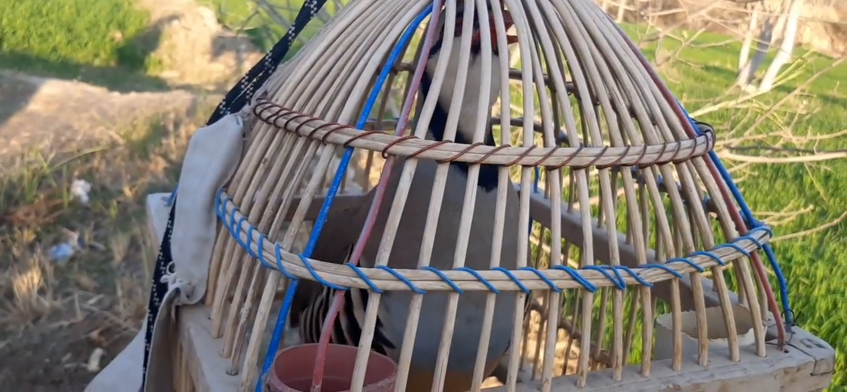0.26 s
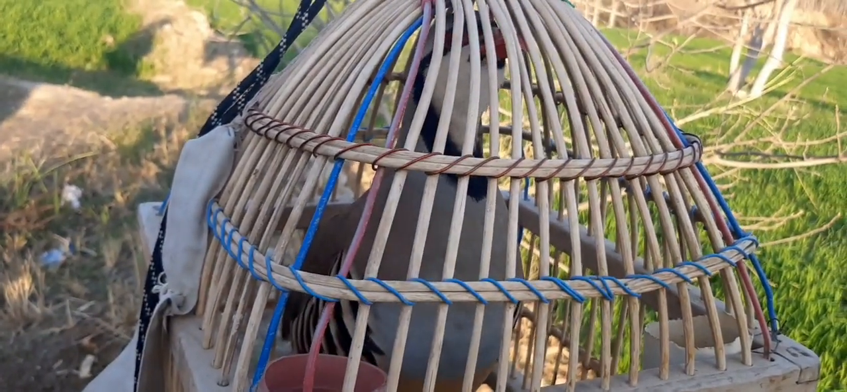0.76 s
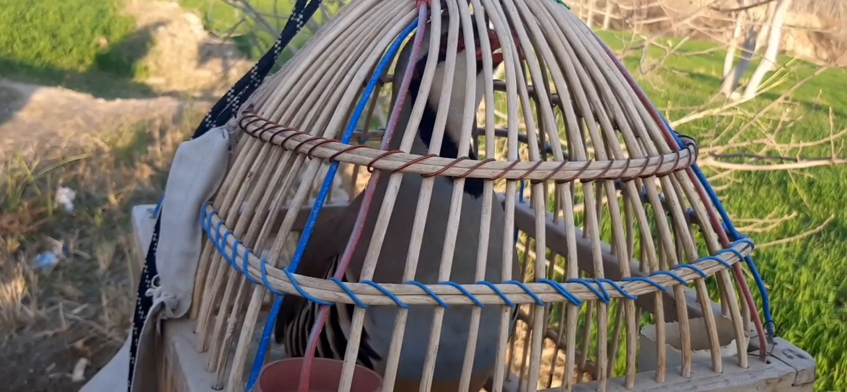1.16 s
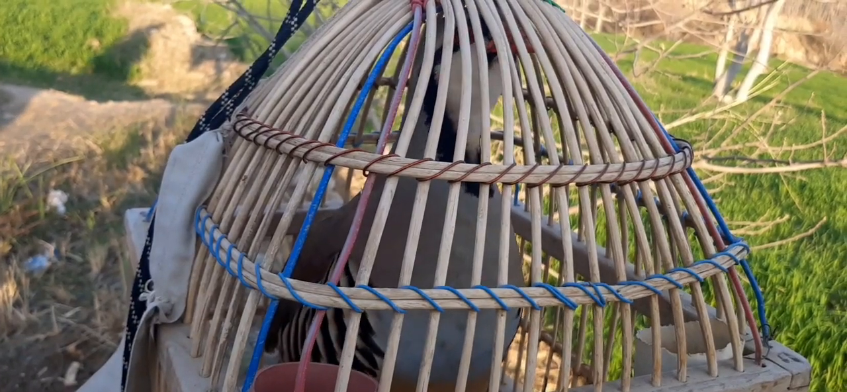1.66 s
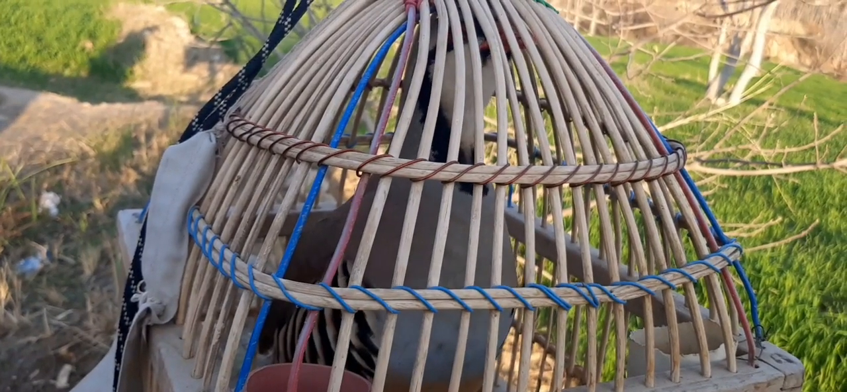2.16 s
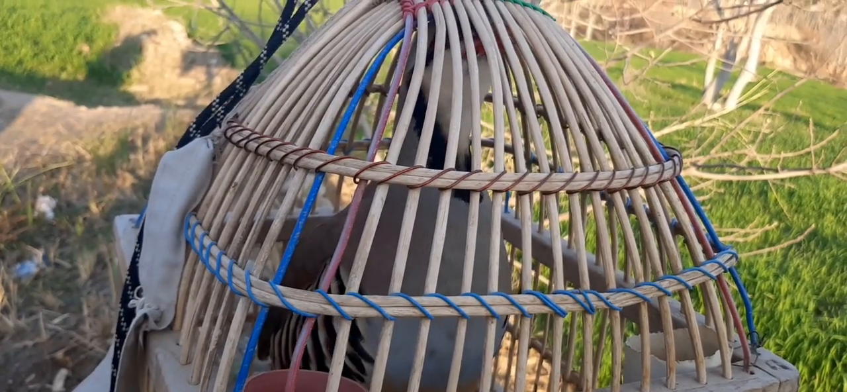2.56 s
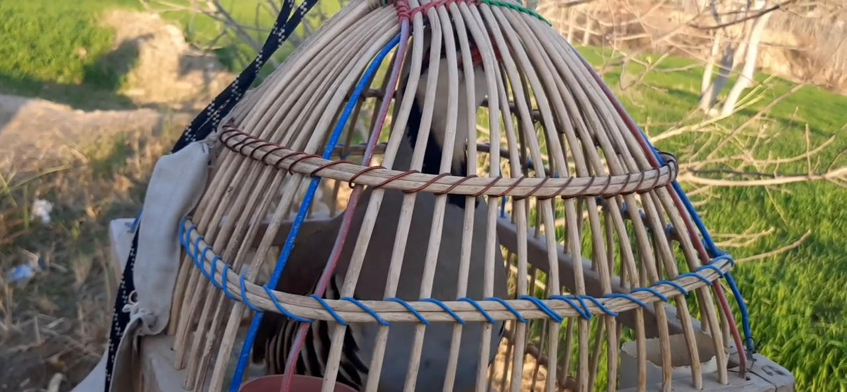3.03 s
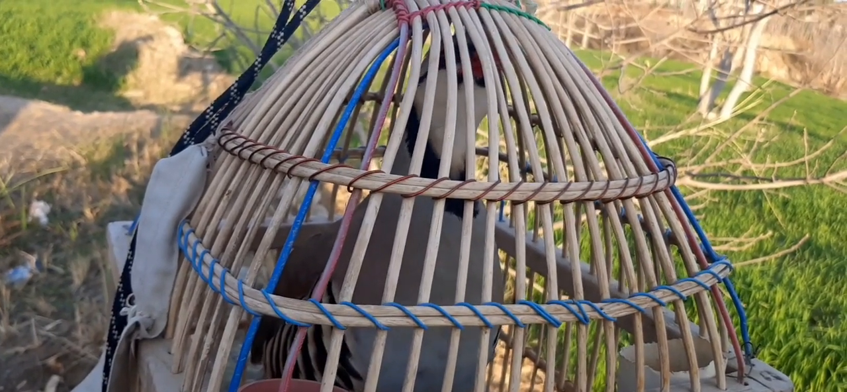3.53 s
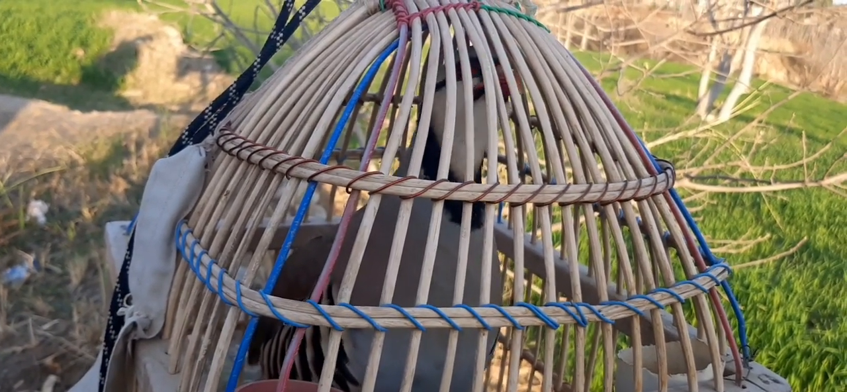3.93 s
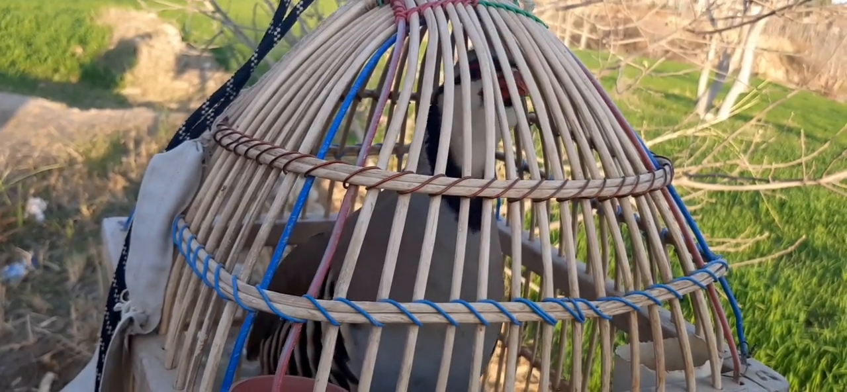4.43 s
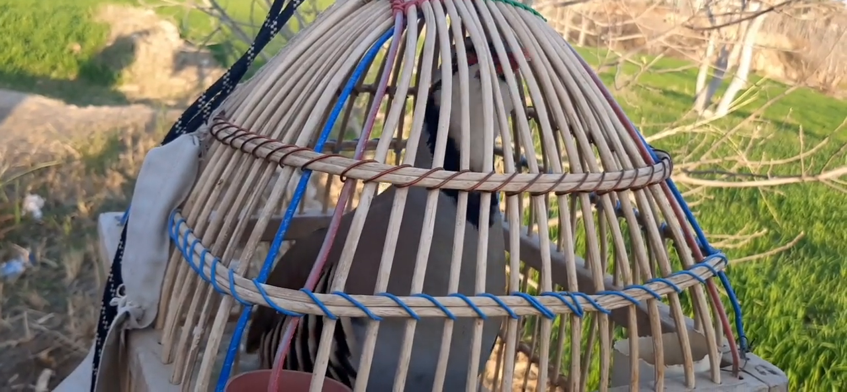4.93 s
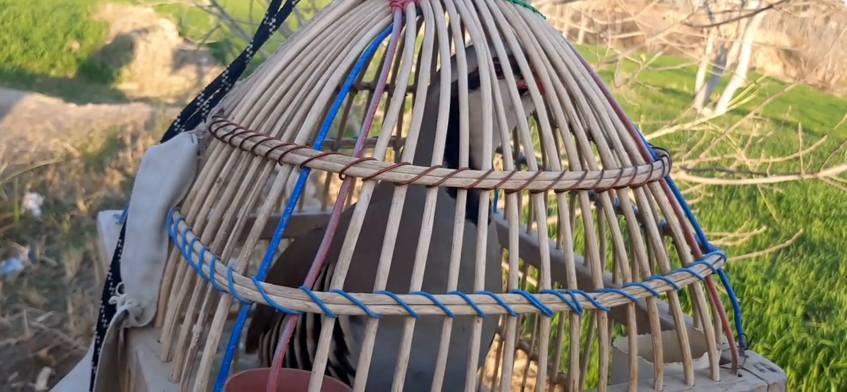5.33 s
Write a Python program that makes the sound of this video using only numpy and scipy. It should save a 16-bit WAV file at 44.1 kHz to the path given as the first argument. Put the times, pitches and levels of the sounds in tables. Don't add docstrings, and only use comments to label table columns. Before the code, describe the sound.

Close, dry stereo phone pickup of a partridge's steady cackle: a sharp chuck, a weak little ka, then a rough buzzing kar, over and over. Early on another partridge overlaps distantly; around one and a half to two seconds two longer slurred notes replace the usual pair. Tiny songbird whistles cluster near the end, with a few cane ticks, a faint rustle and very low distant hum.

```python
import sys
import numpy as np
from scipy import signal
from scipy.fft import rfft, irfft
from scipy.io import wavfile
from scipy.ndimage import uniform_filter1d, minimum_filter1d

SR = 44100
rng = np.random.default_rng(int(sys.argv[2]) if len(sys.argv) > 2 else 0)


def amplitude_ratio(level_db):
    exponent = np.asarray(level_db, float) / 20
    return 10 ** exponent


def digitize_waveform(pressure):
    field = np.atleast_2d(pressure).T
    bounded = np.clip(field, -1, 1)
    quanta = np.round(bounded * 32767).astype(np.int16)
    wavfile.write(sys.argv[1], SR, quanta)


N = 246519
TIME = np.arange(N) / SR
HZ = np.fft.rfftfreq(N, 1 / SR)


def phrase():
    # start [t/s], length [t/s], peak [level/dB], high voice [f/Hz], place of peak [0-1]
    chuck = [(.073, 0.036, -14, 781, 0.1), (.205, .055, -14, 800.8, .2), (.489, .039, -12, 894, 0),
             (.947, 0.054, -14, 871.3, .5), (1.419, 0.048, -13, 784.6, .4),
             (1.831, 0.048, -10.5, 755.8, 0.39), (2.253, 0.052, -14, 810.4, 0),
             (2.702, 0.045, -13.5, 750.4, .3), (3.155, 0.045, -14, 777.4, 0),
             (3.606, .045, -15.5, 744.6, .5), (4.061, 0.041, -15.5, 715.8, 0.35),
             (4.527, 0.043, -14, 801, 0.21), (4.987, 0.044, -15, 715.1, 0.91),
             (5.454, 0.041, -14.5, 732.7, 0.21)]
    ka = [(.628, 0.036, -21.5, 859, 0.2), (1.121, .041, -21.5, 904, 0.41), (2.399, 0.049, -24.5, 887, 0.23),
          (2.84, 0.053, -23, 907.6, .55), (3.299, 0.038, -21.5, 892, 0.28), (3.745, .035, -23.5, 910, 0.25),
          (4.209, 0.033, -23.5, 920, .5), (4.675, 0.038, -21, 890, 0.47), (5.137, 0.038, -21.5, 853.6, .3)]
    kar = [(.272, 0.081, -15, 759, 0.46), (.706, 0.08, -11.5, 818.2, 0.49), (1.2, 0.074, -8.5, 818.5, 0.4),
           (2.482, .081, -12, 837, 0.36), (2.93, .082, -12.5, 824.4, 0.43),
           (3.393, .079, -14.5, 835.1, 0.62), (3.835, .075, -17, 861.1, 0.72),
           (4.297, 0.08, -16, 892, 0.65), (4.762, 0.068, -14.5, 882.3, 0.43),
           (5.227, 0.067, -14, 844, 0.41)]
    slur = [(1.563, .131, -12.5, 844.3, 0.71), (1.977, .14, -14.5, 884, .8)]
    attack_s = (0.0076, 0.0074, 0.0067, 0.0089)
    release_s = (0.0087, 0.007, 0.016, .016)
    edge_db = (-27.5, -18.5, -25, -31.5)
    open_db = (-6.5, -1.5, -10, -1.5)
    close_db = (-12.5, -4.5, -6, -3)
    # at opening, peak, close [level/dB]
    overtone_shape_db = ((-21, -22.5, -12.5), (-4, -3, 0), (-1, -22.5, -13), (-13, -19, -17.5))
    notes = sorted((row, kind) for kind, rows in enumerate((chuck, ka, kar, slur)) for row in rows)
    shapes = []
    for (start_s, length_s, db, _, place), k in notes:
        opening, peak, close = overtone_shape_db[k]
        end_s = start_s + length_s
        peak_s = np.clip(place * length_s, attack_s[k] + .001, length_s - release_s[k] - .001)
        shapes.append([(start_s, db + edge_db[k], opening),
                       (start_s + attack_s[k], db + open_db[k], opening),
                       (start_s + peak_s, db, peak),
                       (end_s - release_s[k], db + close_db[k], close),
                       (end_s, db + edge_db[k], close)])
    return np.array([k for _, k in notes]), np.array([row for row, _ in notes]), shapes


def partridge():
    sag = (.86, 1, .93, .92)
    scoop = (.02, .03, .14, .03)
    low_early_db = (-33.5, -32.5, -32, -27.5)
    low_last_db = (-13.5, -13, -12.5, -21.5)
    low_swell_s = (0.018, .015, 0.022, .02)
    low_end_hz = (267.2, 440.1, 287.3, 247.2)
    hoarse = (.3, .34, .22, .25)
    clear_s = (.706, 1.2, 1.563, 4.675, 4.762)
    pure_s = (2.399,)
    shut_s = (0.021, 0.022, 0.014, .012)
    beak_kind_db = (-19, -8, -15.5, -14)
    # [t/s], [level/dB]
    gape = [(0, 2), (.6, 1), (1.15, 2.5), (1.8, 2), (2.4, 3.5), (2.9, 6.5), (3.5, 2), (4.2, 3.5), (4.8, -1),
            (5.5, 3.5)]
    low_hold_hz, low_sag_hz_s = 500, 6621
    clear_rough, clear_low_db, break_s = .11, -14, 0.031
    pure_rough, pure_sag, pure_low_db = .03, .78, -38
    waver, waver_hz, scoop_s = .02, 14, 0.0053

    kinds, rows, shapes = phrase()
    call_db, overtone_db = played(shapes, fade_s=.0045)
    start, end = rows[:, 0], rows[:, 0] + rows[:, 1]
    note = np.searchsorted((start[1:] + end[:-1]) / 2, TIME)
    by_kind = lambda values: np.array(values)[kinds][note]
    among = lambda times_s: (np.abs(start[:, None] - times_s).min(axis=1) < .02)[note]
    pure, clear = among(pure_s), among(clear_s)
    left_s, length_s = (end[note] - TIME).clip(0), (end - start)[note]

    swell = np.exp(-left_s / by_kind(low_swell_s))
    low_db = by_kind(low_early_db) + (by_kind(low_last_db) - by_kind(low_early_db)) * swell
    resting = clear * ((left_s - break_s) / .008).clip(0, 1)
    rough = by_kind(hoarse) + resting * (clear_rough - by_kind(hoarse))
    rough = np.where(pure, pure_rough, rough)
    low_db = np.where(pure, pure_low_db, low_db + resting * clear_low_db + 3 * wobble(32))

    high_from = rows[note, 3]
    high_to = high_from * np.where(pure, pure_sag, by_kind(sag))
    held = (left_s / length_s).clip(0, 1) ** (length_s / .085) ** 1.3
    high_hz = high_to + (high_from - high_to) * held
    slide = by_kind(scoop) * np.exp(-(TIME - start[note]).clip(0) / scoop_s)
    high_hz *= 1 + waver * ~pure * wobble(waver_hz) - slide
    low_hz = np.minimum(by_kind(low_end_hz) + low_sag_hz_s * left_s,
                        low_hold_hz * (1 + 0.068 * wobble(12)))

    high, high_phase = membrane(high_hz, rough, jitter=.08, scatter_db=6)
    low, low_phase = membrane(low_hz, rough, jitter=0.14, scatter_db=1.5)
    share = np.maximum((low_db + 35.0) / 16, (low_hold_hz - low_hz) / 90).clip(0, 1) * ~pure
    air = rng.standard_normal(N) * (1.0 + np.exp(-(high_phase % 1) / 1.3))
    drive = (1.08 - share) * high + (share + .8 * rough) * low + 1.1 * rough * (.7 + share) * air
    drive -= uniform_filter1d(drive, SR // 200)

    rest = np.sqrt((1 - amplitude_ratio(2 * low_db) - amplitude_ratio(2 * overtone_db)).clip(.04, 1))
    pipe = windpipe(drive, rough, shut=np.exp(-left_s / by_kind(shut_s)))
    beak_db = by_kind(beak_kind_db) + np.interp(TIME, *np.transpose(gape))
    lower = chest(low_phase, low_db, rough) + amplitude_ratio(overtone_db) * overtones(drive)
    call = amplitude_ratio(call_db) * (lower + rest * pipe + beak_treble(drive, air, rough, call_db, beak_db))
    return signal.sosfiltfilt(signal.butter(3, 190, "high", fs=SR, output="sos"), call)


def membrane(hz, rough, jitter, scatter_db):
    phase = np.cumsum(hz * (1 + jitter * rough * wobble(150))) / SR
    at = np.flatnonzero(np.diff(np.floor(phase))) + 1
    late = (phase[at] % 1) / (phase[at] - phase[at - 1])
    size = amplitude_ratio(scatter_db * rough[at] * rng.standard_normal(N)[at]) * np.sqrt(SR / hz[at])
    snaps = np.zeros(N)
    snaps[at - 1], snaps[at] = size * late, size * (1 - late)
    return snaps, phase


def chest(low_phase, low_db, rough):
    low_tone = np.cos(2 * np.pi * low_phase) * amplitude_ratio(5 * rough * wobble(70)) * 1.2
    return low_tone * amplitude_ratio(low_db + np.array([[-2.2], [2.2]]))


def overtones(drive):
    # [f/Hz], width [f/Hz], [level/dB], left minus right [level/dB], left leads [rad],
    # likeness of the two ports [0-1]
    overtone_modes = [(820, 300, 0, -4.5, .2, .99), (1040, 220, -4, -2, .45, .98)]
    above_chest = signal.butter(4, 620, "high", fs=SR, output="sos")
    return steady(body(signal.sosfiltfilt(above_chest, drive), overtone_modes), span_s=0.12)


def windpipe(drive, rough, shut):
    # [f/Hz], width [f/Hz], [level/dB],
    # left minus right [level/dB], left leads [rad], likeness [0-1]
    open_modes = [(1492.4, 96.4, 9, -3, 0.69, 0.96), (1234, 270, -7.5, -2, 0.5, 0.8),
                  (1907, 190, -19, -6.5, 0.48, 0.75)]
    narrowed_modes = [(1393, 250, 2, -4, 0.79, .92), (1417, 43, -2, -4, .5, 0.79)]
    beat_hz, beat_depth = 74.7, 0.88
    pipe = np.sqrt(1 - shut) * steady(body(drive, open_modes), span_s=.016)
    pipe += np.sqrt(shut) * steady(body(drive, narrowed_modes), span_s=.016)
    beat_phase = 2 * np.pi * np.cumsum(beat_hz * (1 + .3 * wobble(20))) / SR
    return pipe * (1 + (beat_depth * rough).clip(0, .9) * np.cos(beat_phase))


def beak_treble(drive, air, rough, call_db, beak_db):
    # [f/Hz], width [f/Hz], [level/dB],
    # left minus right [level/dB], left leads [rad], likeness [0-1]
    beak_modes = [(2498, 200, 3.5, 0.55, 2, .9), (2754, 200, -8, 25, 1.1, 1),
                  (3892, 550, -2, 0.5, 1.45, 0.55), (4800, 339, 6.5, 12, 1.46, 0.79),
                  (5260, 181, 1.5, 9, -2, 0.29)]
    rasp_modes = [(7230, 800, -3.5, 2, 1.8, 0.78), (9150, 170, -12, -3.5, 0.27, .8),
                  (9930, 200, -4.5, -3, 2.5, 0.48), (11975, 1100, -1.5, 9, 1.7, 0.7),
                  (14900, 5000, -9.5, 7.5, 1.7, 0.67)]
    effort_db = call_db + 20.5
    beak = steady(dipped(body(drive + 0.47 * rough * air, beak_modes)), span_s=0.059)
    grain_db = .35 * effort_db + 2.5 * wobble(120)
    rasp = steady(dipped(body(drive + 0.2 * air, rasp_modes)), span_s=.03)
    return amplitude_ratio(beak_db - 1.0 + 0.29 * effort_db) * beak + amplitude_ratio(1.165 * beak_db - 18.0 + grain_db) * rasp


def dipped(x):
    # [f/Hz], width [f/Hz], [level/dB]
    dips = [(3330, 320, -12), (6350, 400, -10), (8400, 400, -10)]
    gain_db = sum(db * np.exp(-((HZ - hz) / width_hz) ** 2) for hz, width_hz, db in dips)
    return irfft(rfft(x) * amplitude_ratio(gain_db), N)


def played(tables, fade_s):
    rows = []
    for note in map(np.array, tables):
        hush = np.zeros(note.shape[1])
        hush[:2] = fade_s, -45
        before = hush.copy()
        before[0] = -fade_s
        rows += [note[0] + before, *note, note[-1] + hush]
    s, *columns = np.transpose(sorted(rows, key=lambda row: row[0]))
    return [uniform_filter1d(np.interp(TIME, s, c), size=90) for c in columns]


def body(drive, modes):
    hz, width_hz, db, pan_db, lead, like = np.array(modes).T[:, :, None]
    power = amplitude_ratio(2 * db) / (1 + (HZ - hz) ** 2 / width_hz ** 2) ** 3
    total, side = power.sum(axis=0), np.array([[1], [-1]])
    pan_db, lead, like = ((power * v).sum(axis=0) / total for v in (pan_db, lead, like.clip(0, 1)))
    spread = np.sqrt(uniform_filter1d(drive ** 2, 64).clip(0))
    scattered = rfft(spread * rng.standard_normal((2, N)))
    heard = np.sqrt(like) * rfft(drive) + np.sqrt(1 - like) * scattered
    return irfft(np.sqrt(total) * amplitude_ratio(side * pan_db / 2) * np.exp(.5j * lead * side) * heard, N)


def steady(x, span_s):
    return x / np.sqrt(uniform_filter1d(np.mean(x ** 2, axis=0), int(span_s * SR)).clip(1e-20))


def wobble(rate_hz):
    x = signal.lfilter([1], [1, -np.exp(-2 * np.pi * rate_hz / SR)], rng.standard_normal(N))
    return x / x.std()


def far_partridge():
    # start [t/s], length [t/s], peak [level/dB]
    far_calls = [(-.04, 0.052, -32), (0.132, 0.076, -38), (0.392, 0.077, -39), (0.579, 0.079, -40),
                 (0.84, 0.067, -36.5), (1.017, .075, -37), (1.155, 0.074, -38.5), (1.251, 0.093, -44.5)]
    # [f/Hz], width [f/Hz], [level/dB], left minus right [level/dB], left leads [rad],
    # likeness [0-1]
    far_throat = [(1495, 100, 1, -10, .3, 0.63), (1930, 670, -0.5, -1.5, 1.3, 1),
                  (2680, 390, -1.5, -3.5, 0.3, 1), (4100, 300, -15.5, -5, 1, 0.4),
                  (5700, 1900, -18.5, 7, 0.1, 0.53), (7300, 750, -28, 5.5, 1.3, 0.37)]
    voice_hz, attack_s, hold = 728, 0.0099, .55
    open_db, sag_db, last_db = -26.5, -3.5, -24
    shapes = [[(s, db + open_db), (s + attack_s, db), (s + hold * length_s, db + sag_db),
               (s + length_s, db + last_db)] for s, length_s, db in far_calls]
    level_db, = played(shapes, fade_s=.012)
    snaps, _ = membrane(voice_hz * (1 + .05 * wobble(6)), np.full(N, .35), jitter=.08, scatter_db=6)
    drive = snaps - snaps.mean() + .6 * rng.standard_normal(N)
    return amplitude_ratio(level_db) * steady(body(drive, far_throat), span_s=0.069)


def songbirds():
    # start [t/s], end [t/s], from [f/Hz], to [f/Hz], [level/dB]
    whistles = [(1.31, 1.431, 3600, 2750, -62), (1.735, 1.843, 3797, 2710, -63.5),
                (2.109, 2.189, 3548, 3294, -70.5), (2.557, 2.642, 3450, 3374, -68),
                (2.78, 2.84, 3561, 3356, -73), (4.45, 4.477, 3586, 3527, -65.5),
                (4.841, 4.896, 2900, 4900, -66), (4.892, 4.931, 4700, 3260, -57.5),
                (4.884, 4.93, 2970, 2370, -69), (4.94, 4.969, 4100, 3280, -56),
                (5.042, 5.095, 2920, 4860, -63.5), (5.096, 5.14, 4113, 3080, -60.5),
                (5.098, 5.133, 2900, 2324, -66.5)]
    fall_bend, rise_bend = 2.8, .7
    out = np.zeros(N)
    for start, end, from_hz, to_hz, db in whistles:
        u = ((TIME - start) / (end - start)).clip(0, 1)
        hz = to_hz + (from_hz - to_hz) * (1 - u) ** (fall_bend if to_hz < from_hz else rise_bend)
        tone = np.sin(2 * np.pi * np.cumsum(hz) / SR)
        out += amplitude_ratio(db + 2.5 * wobble(60)) * np.sin(np.pi * u).clip(0) ** 0.24 * tone
    blur = amplitude_ratio(-31 - 60 * TIME[:SR // 8] / 0.12) * rng.standard_normal((2, SR // 8))
    return .5 * out + signal.fftconvolve(out[None], blur, axes=1)[:, :N]


def cage():
    # [t/s], peak [level/dB], t60 [t/s]
    ticks = [
        (3.084, -55.5, 0.075),
        (4.1407, -56, 0.029),
        (4.168, -59, 0.052),
        (4.9444, -44.5, 0.059),
    ]
    # [t/s], half length [t/s], [level/dB]
    rustles = [
        (1.236, 0.065, -47),
        (4.587, 0.034, -65),
        (4.918, 0.082, -70.5),
        (5.09, 0.054, -76),
    ]
    shape = np.zeros(N)
    for s, db, t60_s in ticks:
        fall_db = 60 * (TIME - s).clip(0) / np.clip(t60_s, .006, .03)
        shape += amplitude_ratio(db - 6.0 - fall_db) * (TIME >= s)
    for s, half_s, db in rustles:
        shape += amplitude_ratio(db + 1.5 * wobble(30)) * np.exp(-((TIME - s) / half_s) ** 2)
    return shape * steady(body(rng.standard_normal(N), [(4600, 3800, 0, 4, 0.64, 0.83)]), span_s=.2)


def echoes(x):
    ground_db, ground_t60_s, trees_db, trees_t60_s = -27.5, 0.1, -37.5, 0.23
    t = TIME[:SR // 2]
    quick, slow = rng.standard_normal((2, 2, len(t)))
    slow = signal.lfilter([1], [1, -.6], slow) * (1 - np.exp(-t / .02))
    tail = amplitude_ratio(ground_db - 60 * t / ground_t60_s) / np.sqrt(ground_t60_s * SR / 14) * quick
    tail += amplitude_ratio(trees_db - 60 * t / trees_t60_s) / np.sqrt(trees_t60_s * SR / 14) * slow
    return signal.fftconvolve(x, tail, axes=1)[:, :N]


def field():
    # [f/Hz], density [level/dB]
    air_spectrum = [(18, -33), (30, -6.5), (154, -2), (337, -32.5), (1830, -26), (2190, -36), (3230, -35),
                    (15000, -44.5)]
    # [t/s], [level/dB]
    hum_level = [(0.0, -82.5), (0.62, -72), (2.19, -81.5), (3.87, -77.5), (4.86, -69), (4.97, -65.5),
                 (5.59, -74.5)]
    table_hz, table_db = np.transpose(air_spectrum)
    colour = amplitude_ratio(np.interp(np.log(HZ + 1), np.log(table_hz), table_db))
    mid, side = rfft(rng.standard_normal((2, N))) * colour
    air = np.array([mid + 0.47 * side, mid - 0.8 * side]) * amplitude_ratio(np.array([[-2.8], [2.8]]))
    bass = 1 / (1 + (HZ / 200) ** 4)
    hum, hiss = irfft(air * bass, N), irfft(air * (1 - bass), N)
    scale = np.sqrt(np.mean(hum ** 2))
    hum_db = np.interp(TIME, *np.transpose(hum_level)) + 1.3 * wobble(6)
    return hum / scale * amplitude_ratio(hum_db) + hiss / scale * amplitude_ratio(-67 + 0.9 * wobble(3))


def scene():
    near, far = partridge(), far_partridge() + songbirds()
    return near + far + echoes(near + amplitude_ratio(15.5) * far) + cage() + field()


def limited(x):
    ceiling = .95
    room = (ceiling / np.abs(x).max(axis=0).clip(1e-9)).clip(None, 1)
    return x * uniform_filter1d(minimum_filter1d(room, size=257), size=129)


def low_pass(x):
    return signal.sosfilt(signal.butter(12, 16630, fs=SR, output="sos"), x)


def record(dry):
    top_cut = signal.ellip(8, .3, 60, 15830, fs=SR, output="sos")
    mix = signal.sosfilt(top_cut, limited(dry))
    return low_pass(mix)


dry = scene()
out = record(dry)
digitize_waveform(out)
```